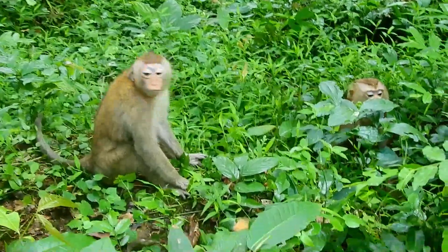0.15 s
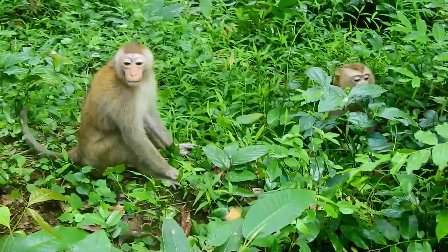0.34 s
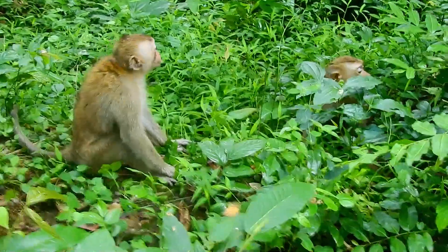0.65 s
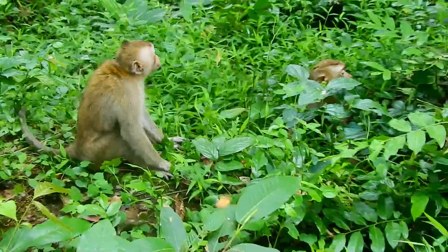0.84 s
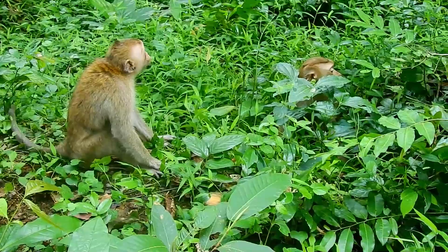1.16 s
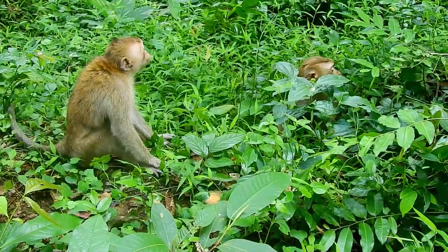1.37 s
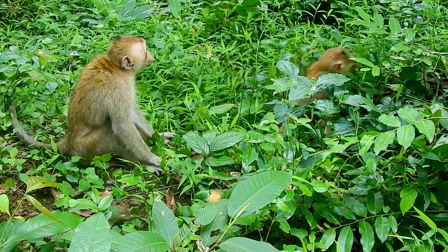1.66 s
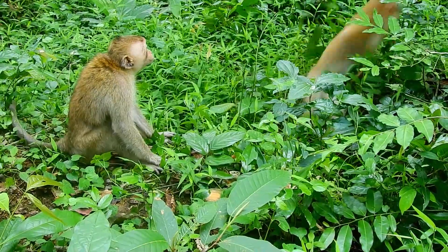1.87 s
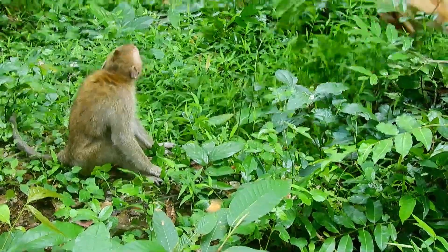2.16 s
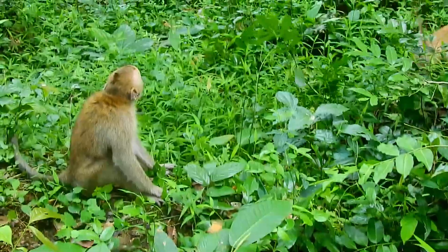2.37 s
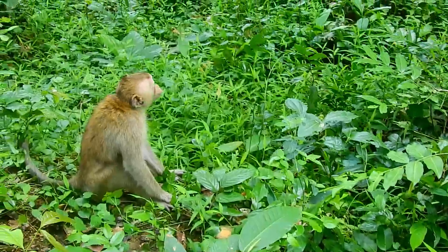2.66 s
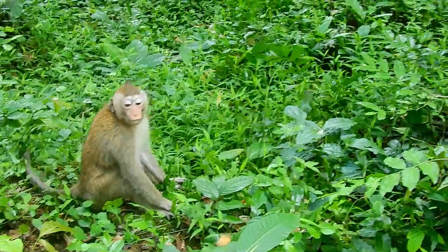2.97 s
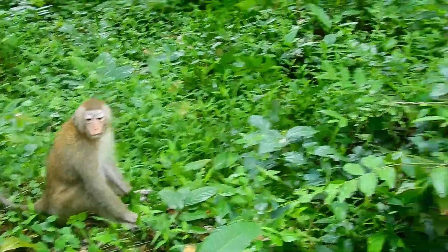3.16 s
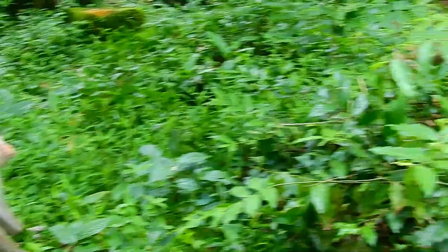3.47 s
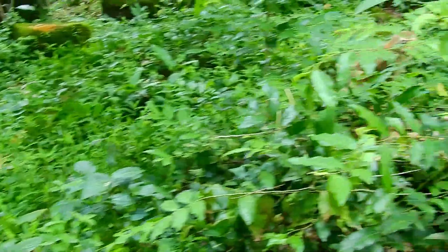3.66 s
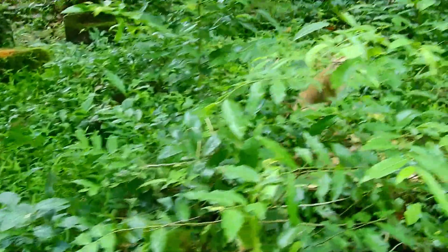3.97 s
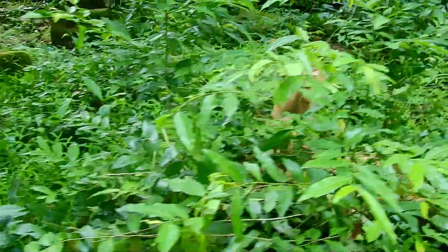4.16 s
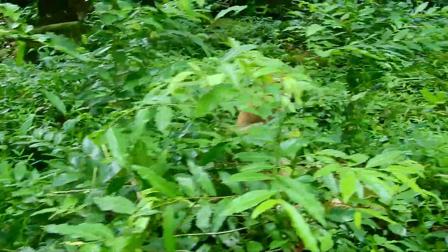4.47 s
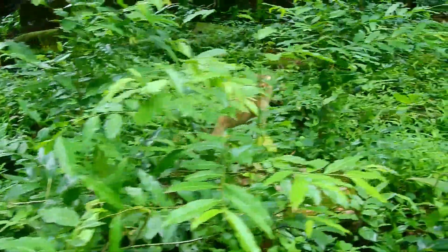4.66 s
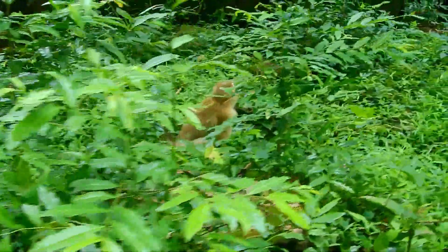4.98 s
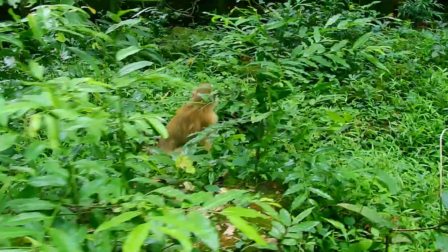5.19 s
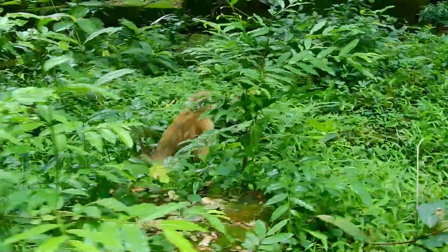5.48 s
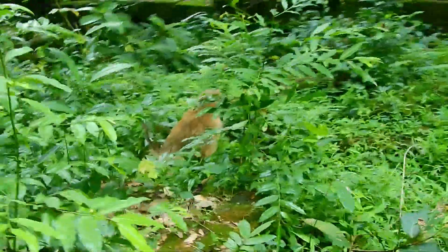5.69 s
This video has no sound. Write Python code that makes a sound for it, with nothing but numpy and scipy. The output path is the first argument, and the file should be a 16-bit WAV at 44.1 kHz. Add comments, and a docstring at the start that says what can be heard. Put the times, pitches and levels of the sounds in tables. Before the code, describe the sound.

Shrill monkey screams swoop up and fall hoarsely, one after another, with soft rustling and a quiet forest hiss behind.

```python
"""A macaque screams repeatedly in forest undergrowth, a few metres away.
Each scream starts as a thin vocal-fold whistle, swoops up and down, and breaks into a rasp as it falls.
Leaves and trunks scatter the sound. Bodies scuff and rustle in the plants
over a faint rumble, a far drone and forest hiss."""
import sys
import numpy as np
from scipy import signal
from scipy.fft import rfft, irfft, next_fast_len
from scipy.io import wavfile
from scipy.ndimage import uniform_filter1d, map_coordinates

SR = 44100
rng = np.random.default_rng(int(sys.argv[2]) if len(sys.argv) > 2 else 0)


def file_out(sig):
    """Save sig as 16-bit WAV at sys.argv[1]."""
    # one column per channel
    cols = np.atleast_2d(sig).T
    # limit, then scale
    lim = np.clip(cols, -1, 1)
    pcm = np.round(lim * 32767).astype(np.int16)
    wavfile.write(sys.argv[1], SR, pcm)


N = 257103
TIME = np.arange(N) / SR


def from_db(db):
    """Decibels to gain."""
    return 10 ** (np.asarray(db) / 20)


def rms_one(x):
    """Scale to unit power."""
    return x / np.sqrt(np.mean(x ** 2) + 1e-20)


def at_hz(points, hz):
    """Interpolate (frequency [Hz], value) points over log frequency."""
    f, value = np.transpose(points)
    return np.interp(np.log(np.maximum(hz, 1)), np.log(f), value)


def colour(x, spectrum):
    """Filter by a (frequency [Hz], gain [dB]) table."""
    size = next_fast_len(x.shape[-1] + 512)
    hz = np.arange(size // 2 + 1) * SR / size
    return irfft(rfft(x, size) * from_db(at_hz(spectrum, hz)), size)[..., :x.shape[-1]]


def evened(x, span_s=0.012):
    """Hold short-term power at 1."""
    return x / np.sqrt(np.abs(uniform_filter1d(x ** 2, int(span_s * SR))) + 1e-12)


def flutter(hz, size):
    """Random motion up to about hz, unit RMS."""
    pole = np.exp(-2 * np.pi * hz / SR)
    run_in = SR // 8
    motion = signal.lfilter([1], [1, -2 * pole, pole * pole], rng.standard_normal(size + run_in))
    return rms_one(motion[run_in:])


def stereo_noise(side_db):
    """Mid/side white noise as left and right."""
    mid, side = rng.standard_normal((2, N))
    return mid + from_db(side_db) * side * np.array([[1], [-1]])


def swell(t, centre_s, length_s):
    """Smooth bump of height 1."""
    return np.exp(-np.minimum(np.abs(2 * (t - centre_s) / length_s) ** 3, 60))


def background(air_gain_db=2.0, drone_gain_db=-0.5, murk_gain_db=-3.0):
    """Deep rumble, a wavering far drone in low noise, and soft forest hiss."""
    # (time [s], rumble [dB], drone and murk [dB], air [dB])
    levels = [(0, -75.5, -73, -78.5), (.6, -76.5, -70, -79), (1.2, -71.5, -71, -78.5),
              (1.8, -70.5, -73.5, -78.5), (2.4, -70, -74.5, -73.5), (3.1, -68.5, -76.5, -72.5),
              (3.4, -77, -72.5, -73.5), (3.62, -65.5, -78, -73.5), (3.9, -72, -75, -74),
              (4.4, -72, -70.5, -75.5), (5.1, -70.5, -74, -73.5), (5.83, -75.5, -71.5, -75.5)]
    # (frequency [Hz], gain [dB])
    rumble_spectrum = [(25, -41), (40, -8), (50, 13.5), (70, 12), (100, 8.5), (140, -17), (250, -45)]
    # (frequency [Hz], gain [dB])
    air_spectrum = [(100, -7), (200, 3), (330, -0.5), (700, -2.5), (1200, -2), (2000, -7), (5000, -5),
                    (7000, -9), (10000, -22.5), (15000, -37)]
    # (frequency [Hz], relative level [dB])
    drone_tones = [(124, -2.5), (151, 2.5), (186, 1), (205, -10)]
    times_s, *curves_db = np.transpose(levels)
    rumble_gain, far_gain, air_gain = [from_db(np.interp(TIME, times_s, db)) for db in curves_db]
    rumble = rms_one(colour(stereo_noise(side_db=-22), rumble_spectrum))
    murk_spectrum = [(70, -28.5), (110, 4), (190, -3.5), (300, -22.5), (700, -59)]
    murk = rms_one(colour(stereo_noise(side_db=-18), murk_spectrum))
    drone = 0
    for hz, db in drone_tones:
        gain = from_db(db + 2.8 * flutter(2.3, N))
        wavering_hz = hz * (1 + .008 * flutter(3.97, N))
        drone += gain * np.sin(2 * np.pi * np.cumsum(wavering_hz) / SR)
    drone = rms_one(drone) * np.interp(TIME, [3.8, 4.2], [.3, 1])
    far = from_db(drone_gain_db) * drone + from_db(murk_gain_db) * murk
    hiss = rms_one(colour(stereo_noise(side_db=-13) * from_db(1.94 * flutter(37, N)), air_spectrum))
    return rumble_gain * rumble + far_gain * far + from_db(air_gain_db) * air_gain * hiss


def undergrowth(grain_db=3.5):
    """Bodies scuff the ground dully and brush crackling leaves aside."""
    # (time [s], level [dB], centre [Hz], length [s])
    scuffs = [(0.488, -71, 218.4, 0.026), (0.741, -62, 200, 0.062), (0.743, -67.5, 720, 0.063),
              (0.92, -73.5, 564, 0.032), (.99, -64.5, 216, 0.031), (0.991, -63.5, 650, 0.032),
              (1.034, -69, 705, 0.042), (2.483, -73.5, 498.4, 0.062), (2.786, -65, 1030, 0.11),
              (2.797, -69.5, 450, 0.064), (3.249, -64, 474, 0.013), (4.415, -78.5, 1396, 0.17),
              (4.525, -67.5, 716, 0.02), (4.555, -74, 1540, 0.16), (4.729, -70.5, 1250, 0.035),
              (5.126, -67.5, 890, 0.016), (5.34, -74, 930, 0.045), (5.682, -69.5, 1007, 0.025)]
    # (time [s], level [dB], length [s])
    rustles = [(0.493, -64.5, 0.012), (4.431, -63.5, 0.044), (4.492, -65, .036), (4.53, -67, 0.022),
               (4.566, -69, 0.073), (5.537, -72.5, 0.13), (5.701, -74, 0.047)]
    # (frequency [Hz], gain [dB])
    leaf_spectrum = [(1000, 3), (2800, -3), (5500, 11.5), (8000, -0.5), (11000, -44), (15000, -26)]
    ground, noise = np.zeros((2, N)), stereo_noise(side_db=-14)
    for time_s, db, hz, length_s in scuffs:
        span = np.abs(TIME - time_s) < 2 * length_s
        bandpass = signal.butter(2, [hz / 1.54, hz * 1.31], "band", fs=SR, output="sos")
        scuff = rms_one(signal.sosfilt(bandpass, noise[:, span]))
        ground[:, span] += from_db(db) * scuff * swell(TIME[span], time_s, length_s)
    brush = sum(from_db(db) * swell(TIME, time_s, length_s) for time_s, db, length_s in rustles)
    crackle = stereo_noise(side_db=-5.5) * from_db(grain_db * flutter(500, N))
    return ground + brush * rms_one(colour(crackle, leaf_spectrum))


def forest(x, near_db=-15, near_s=0.018, tail_db=-12.0, build_s=0.015):
    """Nearby leaves and ground scatter at once; farther trunks return a long tail."""
    # (frequency [Hz], T60 [s])
    decay_times = [(1500, 0.99), (3000, 0.9), (5000, 0.84), (7000, 0.69), (10000, 0.9), (15000, 1)]
    t = TIME[:SR]
    mid, side = rng.standard_normal((2, SR))
    edges_hz = np.geomspace(1000, 16000, 7)
    tail = 0
    for low, high in zip(edges_hz, edges_hz[1:]):
        hz = np.sqrt(low * high)
        # short waves differ more between the two close microphones
        scatter = mid + min(hz / 6000, 1) * side * np.array([[1], [-1]])
        band = signal.sosfilt(signal.butter(2, [low, high], "band", fs=SR, output="sos"), scatter)
        tail += band * from_db(-60 * t / at_hz(decay_times, hz))
    tail = rms_one(tail * (1 - np.exp(-t / build_s)))
    tail = colour(tail, [(2000, 1), (3000, 3.5), (5000, 5.5), (7000, 5.5), (8500, 1), (10000, -1.5)])
    near = rms_one(rng.standard_normal((2, SR)) * np.exp(-t / near_s) * (t > .001))
    response = (from_db(near_db) * near + from_db(tail_db) * tail) / np.sqrt(SR)
    return signal.fftconvolve(x[None], response, axes=1)[:, :N]


def swoop(row, start, sag_hz_per_s, steady_share=.25, crest_recovery=.24, break_rough=.28):
    """The voice climbs to a pinched crest, then breaks downward into an open cry."""
    start_s, start_hz, start_db, start_rough = start
    break_s, crest_hz, bottom_hz, lateness, hold_s, drop_s, fall_s = row[:7]
    crest_db, crest_rough, cry_db, cry_rough = row[7:]
    crest_s, end_s = max(break_s - hold_s, start_s + 1 / SR), break_s + fall_s
    t = TIME[(TIME > start_s) & (TIME <= end_s)]
    climb = np.clip((t - start_s) / (crest_s - start_s), 0, 1)
    # rounded climb, S-shaped drop
    risen = steady_share * climb + (1 - steady_share) * np.sin(np.pi / 2 * climb) ** lateness
    rising_hz = start_hz + (crest_hz - start_hz) * risen
    tension = np.tanh((break_s - t) / (2 * drop_s))
    tension = (tension - tension[-1]) / (np.interp(crest_s, t, tension) - tension[-1])
    floor_hz = bottom_hz + sag_hz_per_s * (end_s - np.maximum(t, break_s))
    pitch_hz = np.where(t < crest_s, rising_hz, floor_hz + (crest_hz - floor_hz) * tension)
    # strain chokes the climb late; the cry opens just before the break
    ease = 1 - climb ** 1.6
    open_s = max(break_s - .011, crest_s)
    loud_s = min(open_s + .009, end_s)
    open_db = crest_db + crest_recovery * (cry_db - crest_db)
    level_db = np.interp(t, [crest_s, open_s, loud_s, end_s], [crest_db, open_db, cry_db - .4, cry_db - 4])
    level_db += (start_db - crest_db) * ease
    hoarse_s = max(break_s + 1.1 * drop_s, loud_s)
    rough = np.interp(t, [crest_s, (crest_s + open_s) / 2, loud_s, hoarse_s],
                      [crest_rough, crest_rough, break_rough, cry_rough])
    rough += (start_rough - crest_rough) * ease
    rough *= 1 - .3 * np.sin(np.pi * climb) ** 2  # clearer mid-climb
    return np.array([t, pitch_hz, level_db, rough])


def gesture(start, sag_hz_per_s, swoops, waver_hz=55, release_s=.034, thinning_s=.0491):
    """Chain one scream's swoops in a wavering voice; the last sags, clears a little and fades."""
    arches = []
    for k, row in enumerate(swoops):
        arches.append(swoop(row, start, sag_hz_per_s * (k == len(swoops) - 1)))
        start = arches[-1][:, -1]
    t, pitch_hz, level_db, rough = np.hstack(arches)
    pitch_hz *= 1 + .008 * flutter(waver_hz, len(t))
    level_db += 1.14 * flutter(waver_hz, len(t))
    left_s = t[-1] - t
    level_db += np.interp(left_s, [0, release_s], [-8, 0])
    rough *= np.interp(left_s, [0, thinning_s], [.79, 1])
    return t, pitch_hz, level_db, rough


def scream(controls, mouth_db, jitter=.07, tremor=.0085, shimmer=.48, second_hz=3900, second_db=-26):
    """Vocal folds whistle on one pitch; roughness shakes them and spreads each partial into a rasp."""
    # (pitch multiple, level in the tone [dB], level in the rasp [dB])
    partials = [(1, -2.5, 1), (2, -10.5, -5), (3, -16, -9.5), (4, -23, -10)]
    # throat and open mouth: (frequency [Hz], gain [dB])
    throat = [(500, -27), (1500, -19.5), (1950, -17.5), (2300, -7), (2800, 3.5), (3600, -4), (4600, 1.5),
              (5700, 0.5), (6700, 2.5), (8000, -8.5), (9500, -18), (11000, -22.5), (13000, -24.5),
              (15500, -25)]
    # folds lock into a three-cycle pattern: (time [s], length [s], depth [dB])
    splits = [(0.143, 0.015, -10), (0.673, 0.013, -12.5), (2.579, 0.012, -19), (3.164, 0.014, -11),
              (3.922, 0.036, -8), (4.031, 0.024, -17), (4.85, 0.038, -11)]
    # tones of that pattern: (frequency [thirds of pitch], level [dB])
    split_tones = [(2, -3), (5, 1), (6, 4), (8, 1), (9, 0)]
    t, pitch_hz, level_db, rough = controls
    size = len(t)
    rough = np.clip(rough * (1 + .25 * flutter(70, size)), 0, 1)
    pitch_hz = pitch_hz * (1 + .04 * rough * flutter(110, size))
    shaken_hz = pitch_hz * (1 + jitter * rough * flutter(302.3, size) + tremor * flutter(201, size))
    phase = 2 * np.pi * np.cumsum(shaken_hz) / SR
    mouth = [(3300, 0), (4500, mouth_db[0]), (6300, 0.011), (9000, mouth_db[1])]
    tract = [(hz, db + at_hz(mouth, hz)) for hz, db in throat]

    def partial(multiple):
        """One multiple of the pitch; the folds give out near 13 kHz."""
        return np.sin(multiple * phase) * np.clip((13200 - multiple * pitch_hz) / 2000, 0, 1)

    tone = sum(from_db(db) * partial(multiple) for multiple, db, _ in partials)
    split = sum(from_db(db) * swell(t, time_s, length_s) for time_s, length_s, db in splits)
    tone += split * sum(from_db(db) * partial(thirds / 3) for thirds, db in split_tones)
    # a weak second vibration adds sidebands
    second = np.sin(2 * np.pi * second_hz * t) * np.clip((9500 - pitch_hz) / 2000, 0, 1)
    tone += from_db(second_db) * partial(1) * second
    tone = evened(colour(tone, tract))
    tone *= (1 + shimmer * np.sqrt(rough) * flutter(250, size)) / np.sqrt(1 + shimmer ** 2 * rough)

    # cycle-to-cycle chaos: wider at high pitch and roughness
    chaos_hz = 120 + .29 * pitch_hz * (.6 + rough ** 2)
    chaos_clock = np.cumsum(chaos_hz) / 2000
    strands = [(multiple, db) for multiple, _, db in partials] + [(2 / 3, -13), (1 / 2, -11)]
    # air jet through tight folds
    rasp = from_db(-17) * (np.minimum(pitch_hz, 7500) / 5000) ** 2 * rng.standard_normal(size)
    for multiple, db in strands:
        chaos = map_coordinates(flutter(2000, int(chaos_clock[-1]) + 2), [chaos_clock], order=1)
        rasp += from_db(db) * chaos * partial(multiple)
    rasp = evened(colour(rasp, tract))

    # slack folds settle into a tone; overstretched ones break up sooner
    stretch = np.interp(pitch_hz, [2200, 3000, 6000, 9000], [.9, 1, 1.05, 1.4])
    breakup = np.interp(rough, [0, .18, .45, .9], [.01, .04, .34, 1])
    blend_rad = np.pi / 2 * np.minimum(breakup * stretch, 1)
    voice = np.cos(blend_rad) * tone + np.sin(blend_rad) * rasp
    fade = np.clip((t - t[0]) / 0.0017, 0, 1) * np.clip((t[-1] - t) / 0.0037, 0, 1)
    out = np.zeros(N)
    out[np.searchsorted(TIME, t)] = from_db(level_db) * fade * voice
    return out


def macaque():
    """A run of screams, each made of the swoops that break before the next starts."""
    # (start [s], start pitch [Hz], start level [dB], start roughness [0-1], closing sag [Hz/s],
    #  mouth gain at 4.5 kHz [dB], mouth gain from 9 kHz up [dB])
    screams = [(0, 3093, -38.5, 0.5, 17200, 3, -3.5), (.529, 7002, -47, .05, 16060, 3.5, 2),
               (1.261, 6300, -50, 0.05, 15390, 2, 1), (1.829, 3476, -62, .24, 3100, -2, 2.5),
               (2.196, 7320, -62, 0.32, 13580, 0, -4), (2.44, 4340, -61.5, 0.67, 11930, -4, 5.5),
               (3.025, 7377, -60.5, .2, 14940, 4, 1.5), (3.772, 6360, -47.5, 0.01, 15250, 0.5, 6.5),
               (4.71, 7006, -56, 0.18, 10480, 5.5, 3)]
    # (break [s], crest [Hz], bottom [Hz], climb lateness [exponent], crest to break [s],
    #  drop time constant [s], break to bottom [s], crest level [dB], crest roughness [0-1],
    #  cry level [dB], cry roughness [0-1])
    swoops = [(.128, 9890, 1858, 2.6, .02, .012, .098, -54.5, 0.74, -36.5, .5),
              (.634, 11280, 4044, 2.7, .05, .01, 0.045, -74, 0.06, -36.5, 0.14),
              (.798, 7417, 1860, 2.03, .033, 0.0052, 0.098, -47, 0.7, -38, 0.55),
              (1.341, 9200, 7470, 1.28, .021, .004, .014, -63, .45, -49.5, .5),
              (1.372, 7535, 3074, 0.88, .012, 0.0062, .026, -46, 0.3, -36.5, 0.43),
              (1.527, 6597, 1913, 6.9, 0.066, 0.0065, 0.074, -46, 0.53, -38, 0.56),
              (1.862, 5296, 5253, 1.01, .012, .004, .008, -57, .4, -50.5, .7),
              (1.972, 9210, 2887, 1.1, 0.046, .0045, 0.05, -60, 0.73, -36, 0.65),
              (2.097, 7050, 2289, 2.9, 0.029, .0037, 0.079, -52.5, .45, -37, 0.29),
              (2.25, 7810, 1930, 1.1, 0.026, 0.0042, 0.048, -59, 0.33, -42, .47),
              (2.541, 7905, 4103, 1.1, .024, 0.0073, 0.046, -59, .8, -40, .48),
              (2.624, 6150, 6093, 1.47, .012, 0.0015, 0.00207, -55, .6, -23, .25),
              (2.752, 6595, 1937, 1.23, .109, .0035, .062, -34.5, .95, -39.5, .85),
              (3.095, 9494, 8030, 1.6, 0.026, 0.0081, .023, -72, 0.26, -60.5, 0.48),
              (3.13, 7874, 3592, 1, .01, .011, .047, -61, .25, -38, .64),
              (3.283, 6616, 1872, 5.9, 0.055, 0.0089, 0.088, -40, 0.1, -37, 0.57),
              (3.854, 9010, 6295, 1.17, .021, .006, 0.012, -62, 0.05, -39, 0.12),
              (3.881, 6860, 4000, 1.44, 0.0056, 0.0062, .05, -37, 0.12, -36.5, .07),
              (4.033, 5383, 1865, 3.2, 0.042, 0.0053, 0.067, -42.5, 0.17, -39, 0.51),
              (4.806, 9920, 3850, 1.97, 0.026, .011, .049, -76.5, 0.55, -40.5, 0.47),
              (4.949, 9270, 2990, 2.9, 0.022, 0.012, .051, -55, 0.74, -37, 0.77),
              (5.122, 6500, 1806, 1.94, 0.025, .0071, 0.088, -45.5, 0.89, -40, 0.69)]
    next_starts_s = [row[0] for row in screams[1:]] + [np.inf]
    out = np.zeros(N)
    for (start_s, hz, db, rough, sag_hz_per_s, *mouth_db), next_s in zip(screams, next_starts_s):
        own_swoops = [row for row in swoops if start_s < row[0] < next_s]
        out += scream(gesture((start_s, hz, db, rough), sag_hz_per_s, own_swoops), mouth_db)
    return out


def from_the_right(x, lag_s=1e-5):
    """Sound reaches the left microphone later."""
    size = next_fast_len(N)
    hz = np.arange(size // 2 + 1) * SR / size
    left = irfft(rfft(x, size) * np.exp(-2j * np.pi * hz * lag_s), size)[:N]
    return np.array([left, x])


def gain_control(x, threshold_db=-43.0, slope=0.63, release_db_per_s=90, sense_s=0.0025):
    """Loud sound cuts the gain at once; it recovers steadily."""
    power = np.abs(uniform_filter1d(np.mean(x ** 2, axis=0), int(sense_s * SR)))
    cut_db = slope * np.maximum(10 * np.log10(power + 1e-14) - threshold_db, 0)
    held_db = np.maximum.accumulate(cut_db + release_db_per_s * TIME) - release_db_per_s * TIME
    return x * from_db(-uniform_filter1d(held_db, size=100))


def scene():
    """The macaque slightly to the right, among leaves."""
    voice = macaque()
    return from_the_right(voice) + forest(voice) + undergrowth() + background()


def record(dry):
    """Slightly hotter left microphone, gain control, steep low-pass."""
    levelled = gain_control(dry * from_db([[.35], [-.35]]))
    return signal.sosfilt(signal.ellip(10, .1, 80, 15700, fs=SR, output="sos"), levelled)


dry = scene()
out = record(dry)
file_out(out)
```